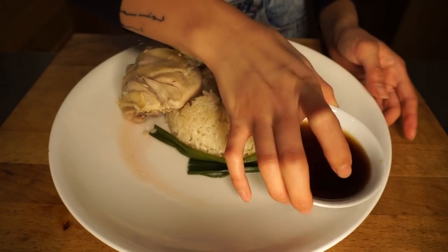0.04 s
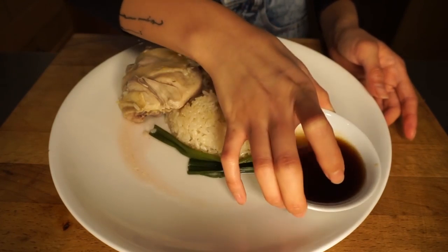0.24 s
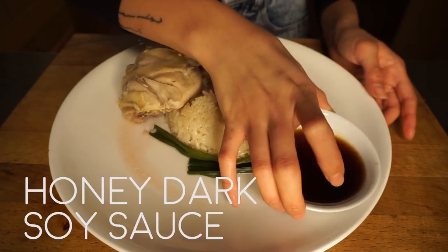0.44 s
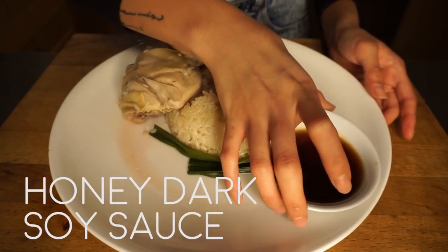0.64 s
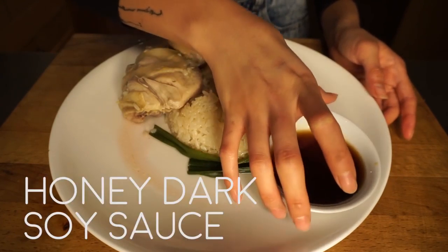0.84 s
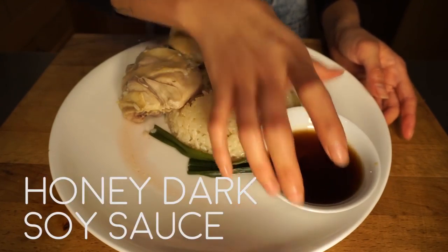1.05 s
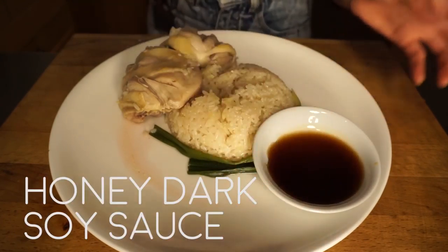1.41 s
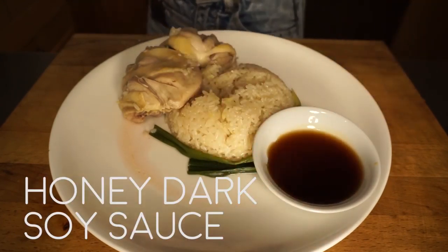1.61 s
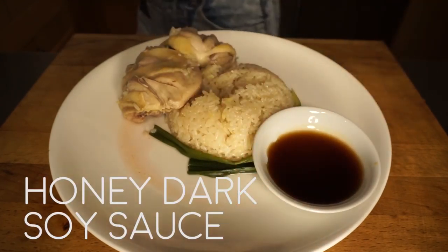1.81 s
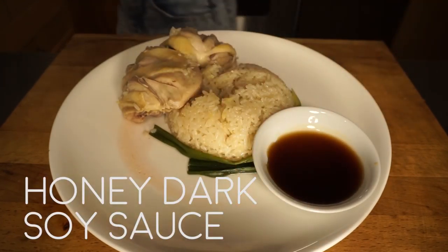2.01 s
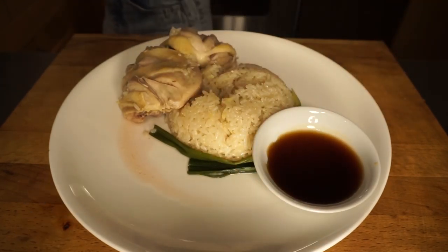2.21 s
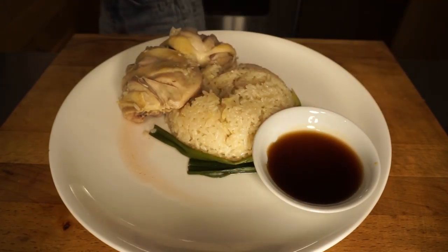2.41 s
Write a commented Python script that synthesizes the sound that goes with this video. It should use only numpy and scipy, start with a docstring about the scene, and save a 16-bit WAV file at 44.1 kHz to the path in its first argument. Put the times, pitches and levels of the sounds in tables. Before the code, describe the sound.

A small ceramic bowl is set on a plate with a ringing clink, then a lighter, brighter one. A few tiny clicks and a faint clothing rustle follow, heard close up in a quiet kitchen with humming ventilation.

```python
"""A small ceramic sauce bowl is set down on a dinner plate in a quiet kitchen: a clink, a few gritty ticks
as its foot settles, then a lighter, brighter clink as the fingers let go. Each contact scratches the glaze,
makes the plate knock and sets the bowl ringing. Later come a few small dry clicks and a soft rustle of
clothing as the arm draws back. Ventilation hums throughout, with a background hiss that dips for a while."""
import sys
import numpy as np
from scipy import signal
from scipy.fft import rfft, irfft
from scipy.io import wavfile
from scipy.ndimage import uniform_filter1d

SR = 44100
rng = np.random.default_rng(int(sys.argv[2]) if len(sys.argv) > 2 else 0)


def store_pcm(level_fs):
    """Save levels as 16-bit WAV."""
    pcm = np.round(np.clip(level_fs, -1, 1) * 32767).astype(np.int16)
    wavfile.write(sys.argv[1], SR, np.atleast_2d(pcm).T)


N = 112454

# tone colour of the ventilation's rumble and of the background hiss (f/Hz, relative level/dB)
RUMBLE_SPECTRUM = [(20, -35), (28, -21), (36, -4.5), (55, -6.5), (80, -9.5), (115, -6), (200, 1), (290, -3),
                   (440, -8), (700, -24), (1200, -50.5), (3000, -65)]
HISS_SPECTRUM = [(60, -47), (200, -8.5), (600, 8.5), (1300, 1.5), (1900, 1), (2900, -1), (3700, -8),
                 (5200, -13), (8000, -17.5), (15500, -17)]
# how wide each sounds between the ears (f/Hz, side minus mid level/dB)
RUMBLE_WIDTH = [(40, -22), (120, -27.5), (260, -18.5), (700, -10.5)]
HISS_WIDTH = [(300, -6.5), (3000, -1.5), (6000, 2.5), (15000, -2)]
# the hiss ducks after the first clink and recovers (t/s, level/dB)
HISS_CURVE = [(0, -57), (.24, -57), (.45, -63), (.75, -62), (1.2, -61), (1.4, -59), (1.62, -58.5),
              (1.85, -57.5), (2.1, -56.5), (2.55, -58)]
# steady tones of the ventilation (f/Hz, level/dB)
HUM_TONES = [(118.6, -62), (160.5, -58), (237.5, -62.5), (581, -71.5), (1561, -73), (1680, -90)]
# the kitchen's echo by band; t60 is the time to fade by 60 dB (f/Hz, t60/s, relative level/dB)
ROOM_BANDS = [(250, 1, 9.5), (724, 0.591, 1.5), (1030, 0.888, -4.5), (1720, 0.744, 0.5), (3000, 0.363, 8),
              (7000, 0.98, -3.5), (14000, 0.3, -0.5)]
# tone colour of sliding cloth (f/Hz, relative level/dB)
CLOTH_SPECTRUM = [(1500, -12), (3000, -0.5), (4800, -2.5), (7000, -9.5), (10000, -11.5), (15000, -9)]
# small dry clicks (t/s, peak level/dB, centre f/Hz, bandwidth/Hz, t60 of the grit/s)
DRY_CLICKS = [(0.3116, -46, 4750, 3000, 0.011), (0.3376, -49, 7500, 6040, 0.016),
              (0.3754, -46, 4070, 3000, 0.0083), (0.3793, -43, 4900, 7000, 0.0092),
              (1.4734, -36, 5320, 5400, 0.00525), (1.486, -35, 4920, 5500, 0.0103),
              (1.4965, -36, 5800, 7540, 0.0042), (1.5542, -32, 7070, 5000, 0.00787),
              (1.6090, -36.5, 2277, 503, 0.0076), (1.6260, -39, 3000, 5030, 0.0087)]
# tones of the plate's knock, damped by the food and the table (f/Hz, t60/s, relative level/dB)
PLATE_MODES = [(767, 0.019, -21.5), (856, 0.0219, -16), (1224.6, 0.01023, -12.5), (1476.2, 0.0152, -12.5),
               (1860, 0.012, -48.5), (2582, 0.036, -31)]
# tones of the ringing china; each wavers against a close twin (f/Hz, free t60/s, twin's offset/Hz,
# relative level for a soft contact/dB, the same for a hard one/dB, left minus right/dB)
BOWL_MODES = [(434, 0.183, 1.7, -37, -35, 3), (738, 0.88, 12, -44, -44, -1),
              (849, 0.117, 10, -40.5, -25, -1.5), (922.4, 0.251, 9.6, -31, -43.5, -5.5),
              (1366, .56, 5.4, -21.8, -48, -3), (1394, 0.546, 3.3, -37.5, -25, -4.5),
              (1888.4, 0.78, 7.33, -37.5, -46, -10), (2492.3, .5, 2.4, -30.5, -35, 4),
              (3171.3, 0.416, 3.3, -41, -32.5, -4), (4020, 0.54, 23, -81, -39, 12),
              (4126, 0.069, 79, -68.5, -26, -12), (5000, 0.0336, 37, -50, -52.5, 13.5),
              (6605, 0.82, 7.3, -88.5, -51, -2.5), (8410, 0.46, 6, -78, -59.5, -2),
              (7990, 0.079, 31, -67, -58.5, -1.5), (9890, .15, 19, -66, -58.5, -8),
              (11140, 0.294, 8, -72, -41, -11), (11900, .2, 25, -70, -55, -1),
              (13700, .22, 19, -80, -48, -1.5)]
# the bowl touches the plate (t/s, strength/dB, hardness 0-1, extra gain of the ring/dB,
# share of the free ring time 0-1, gain of the scratch/dB)
CONTACTS = [(0.2434, -11, 0.1, -26.5, 1.0, -40.5), (0.2446, 1, 0.02, -2.5, 0.99, -38.5),
            (0.7689, -26.5, 0.82, -22, 0.04, -46), (0.7725, -20.5, 0.87, 7.5, 0.37, -40)]


def undb(db):
    """Turn decibels into a gain."""
    return 10 ** (np.asarray(db) / 20)


def unit(x):
    """Scale a sound to an average (rms) level of 1."""
    return x / np.sqrt(np.mean(x ** 2))


def pan(db):
    """Left and right gains that make the left louder by db."""
    return undb(np.array([[db], [-db]]) / 2)


def fade(t, t60):
    """Die away by 60 dB every t60 seconds; silent before t = 0."""
    return (t >= 0) * np.exp(-np.log(1000) * np.maximum(t, 0) / t60)


def across_pitch(hz, values):
    """Join points into a curve over all frequencies, with the octaves evenly spaced."""
    return np.interp(np.log(np.fft.rfftfreq(N, 1 / SR) + 1), np.log(hz), values)


def colour(x, points):
    """Shape a sound's lows and highs by (f/Hz, level/dB) points."""
    hz, db = np.array(points).T
    return irfft(rfft(x) * undb(across_pitch(hz, db)), N)


def noise(spectrum):
    """Noise of level 1 with the given tone colour."""
    return unit(colour(rng.standard_normal(N), spectrum))


def stereo(mid, side):
    """Make left and right from what the ears share (mid) and what differs (side)."""
    return np.array([mid + side, mid - side])


def mode(t, hz, t60, rise_s):
    """One tone of a struck object: it swells while the contact lasts, then fades."""
    return np.sin(2 * np.pi * hz * t) * fade(t, t60) * (1 - np.exp(-t / rise_s))


def add(track, start, sound):
    """Mix a stereo sound in at a start time in seconds."""
    i = int(start * SR)
    track[:, i:i + sound.shape[-1]] += sound[..., :N - i]


def background(rumble_db=-48.5):
    """Ventilation rumbles and hums steadily. A wider background hiss ducks after the first clink
    and recovers along a set curve, much as with a gain control."""
    t = np.arange(N) / SR
    rumble = stereo(noise(RUMBLE_SPECTRUM), colour(noise(RUMBLE_SPECTRUM), RUMBLE_WIDTH))
    hiss = stereo(noise(HISS_SPECTRUM), colour(noise(HISS_SPECTRUM), HISS_WIDTH))
    hiss_db = np.interp(t, *np.array(HISS_CURVE).T)
    hum = sum(undb(db) * np.sqrt(2) * np.sin(2 * np.pi * (hz * t + rng.random())) for hz, db in HUM_TONES)
    return undb(rumble_db) * rumble + hum + undb(hiss_db) * hiss


def kitchen_echo(x, delay_s=0.00262, build_s=0.005, width=0.324):
    """Reflections blur together, build up quickly and die away at their own rate in each band."""
    t = np.arange(N) / SR - delay_s
    hz, t60, db = np.array(ROOM_BANDS).T
    spectrum = rfft(stereo(rng.standard_normal(N), width * rng.standard_normal(N)))
    bands = [irfft(spectrum * across_pitch(hz, share), N) for share in np.eye(len(hz))]
    tail = sum(band * fade(t, decay) * undb(band_db) for band, decay, band_db in zip(bands, t60, db))
    tail *= 1 - np.exp(-np.maximum(t, 0) / build_s)
    return signal.fftconvolve(x, tail / np.sqrt(SR * .04), axes=1)[:, :N]


def cloth_rustle(crest_s=1.59, spread_s=0.295, crest_db=-67.5, flicker_db=2.87):
    """Clothing slides as the arm draws back: a soft noise that swells and fades unevenly."""
    t = np.arange(N) / SR
    flicker = unit(uniform_filter1d(rng.standard_normal(N), size=700))
    swell = np.exp(-((t - crest_s) / spread_s) ** 2)
    cloth = stereo(noise(CLOTH_SPECTRUM), .6 * noise(CLOTH_SPECTRUM))
    return cloth * swell * undb(crest_db + flicker_db * flicker)


def dry_clicks(grit_db=-11, width=0.61):
    """Tiny snaps: one sharp pulse and a little grit, coloured by one broad resonance."""
    t = np.arange(SR // 10) / SR
    pulse = t == 0
    track = np.zeros((2, N))
    for start, db, hz, bandwidth, t60 in DRY_CLICKS:
        mid, side = rng.standard_normal((2, len(t))) * fade(t, t60) * undb(grit_db)
        resonance = signal.iirpeak(hz, hz / bandwidth, fs=SR)
        snap = signal.lfilter(*resonance, stereo(mid + pulse, width * side))
        snap = signal.lfilter(*resonance, snap)  # a second pass narrows the band
        add(track, start, undb(db) * snap / np.abs(snap.mean(axis=0)).max())
    return track


def glaze_scratch(t, hardness, soft_t60=0.0146, hard_t60=0.0127, band_hz=(3430, 13900)):
    """The glaze scrapes in a bright burst; a hard contact leaves a shimmer of dense high overtones."""
    scrape = fade(t, soft_t60 + hardness * (hard_t60 - soft_t60))
    shimmer = hardness * undb(-17) * fade(t, t60=0.39)
    burst = rng.standard_normal((2, len(t))) * (scrape + shimmer)
    return signal.sosfilt(signal.butter(2, band_hz, "band", fs=SR, output="sos"), burst)


def plate_knock(t, low_cut_hz=260):
    """The struck plate only knocks, because the food and the table damp its tones."""
    knock = sum(undb(db) * mode(t, hz, t60, rise_s=0.000466) for hz, t60, db in PLATE_MODES)
    low_cut = signal.butter(2, low_cut_hz, "high", fs=SR, output="sos")
    return signal.sosfilt(low_cut, knock) * pan(db=-0.5)


def bowl_ring(t, hardness, ring_share, rise_s=0.00123, twin_db=-5, settle_s=0.156):
    """The china rings in wavering pairs of tones, and fades faster once the bowl's foot has settled."""
    ring = np.zeros((2, len(t)))
    for hz, free_t60, offset, soft_db, hard_db, pan_db in BOWL_MODES:
        gain = undb(soft_db + hardness * (hard_db - soft_db))
        t60 = free_t60 * ring_share
        pair = mode(t, hz, t60, rise_s) + undb(twin_db) * mode(t, hz + offset, t60, rise_s)
        ring += gain * pair * pan(pan_db)
    settling = fade(np.maximum(t - settle_s, 0), t60=0.42)
    return ring * settling


def bowl_on_plate():
    """Each contact knocks the plate, sets the bowl ringing and scratches the glaze."""
    t = np.arange(SR) / SR
    knock, ring, scratch = np.zeros((3, 2, N))
    for start, db, hardness, ring_db, ring_share, scratch_db in CONTACTS:
        add(knock, start, undb(db) * plate_knock(t))
        add(ring, start, undb(db + ring_db) * bowl_ring(t, hardness, ring_share))
        add(scratch, start, undb(scratch_db) * glaze_scratch(t, hardness))
    return knock, ring, scratch


def scene():
    """China and clicks close by with their echo, over the background and the rustle."""
    backdrop = background()
    knock, ring, scratch = bowl_on_plate()
    ticks = scratch + dry_clicks()
    echo = kitchen_echo(undb(-6.5) * knock + undb(-13) * ring + undb(-8) * ticks)
    return backdrop + echo + cloth_rustle() + ticks + knock + ring


def record(dry, top_hz=15900):
    """Cut away the very top of the treble."""
    return signal.sosfilt(signal.ellip(10, .2, 80, top_hz, fs=SR, output="sos"), dry)


dry = scene()
out = record(dry)
store_pcm(out)
```